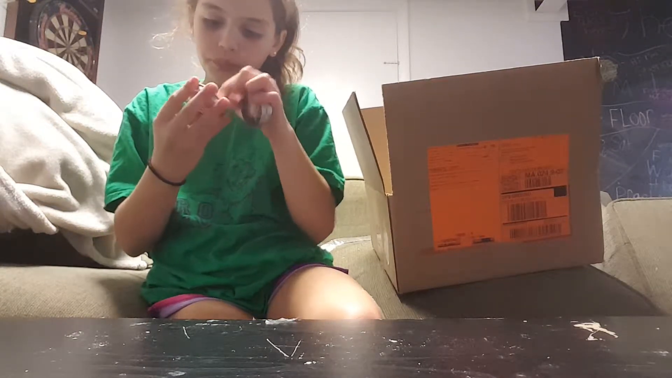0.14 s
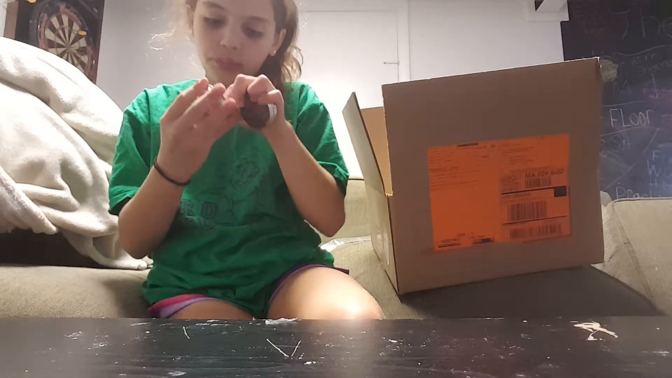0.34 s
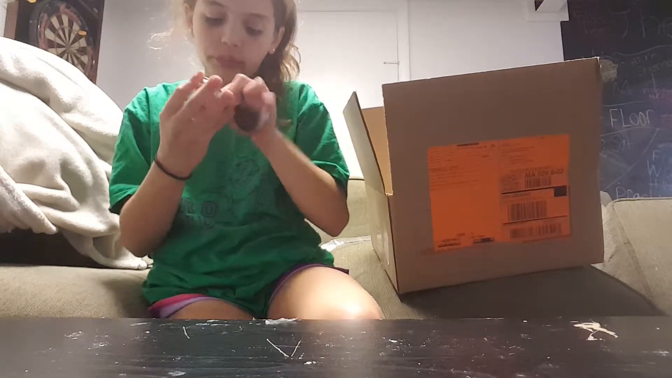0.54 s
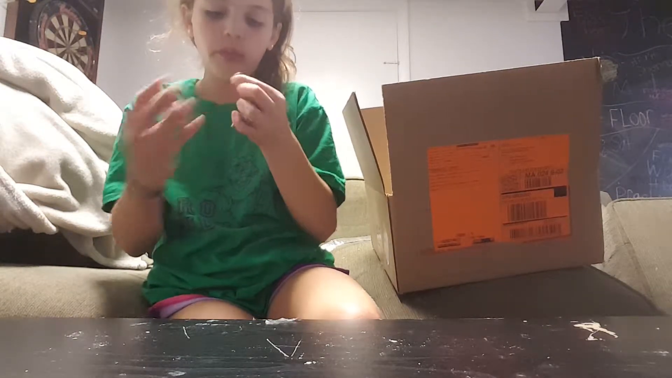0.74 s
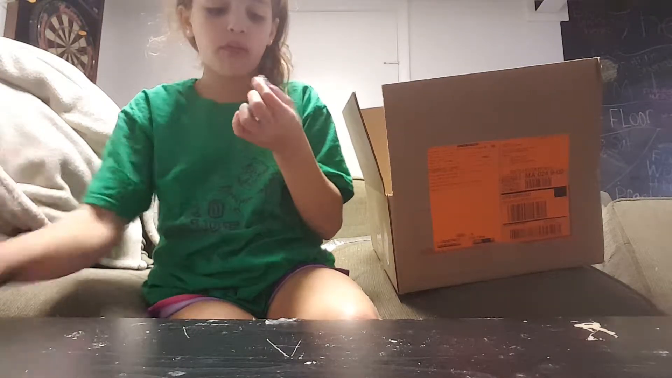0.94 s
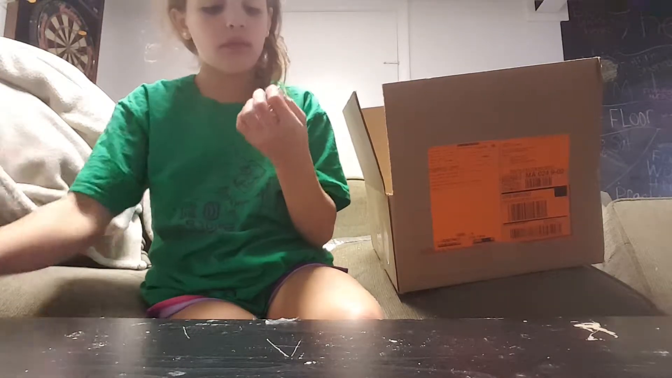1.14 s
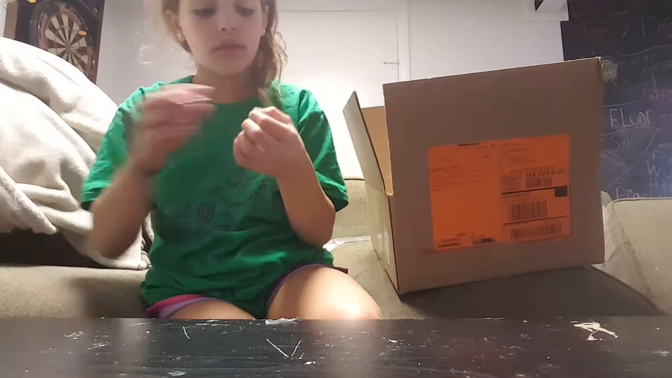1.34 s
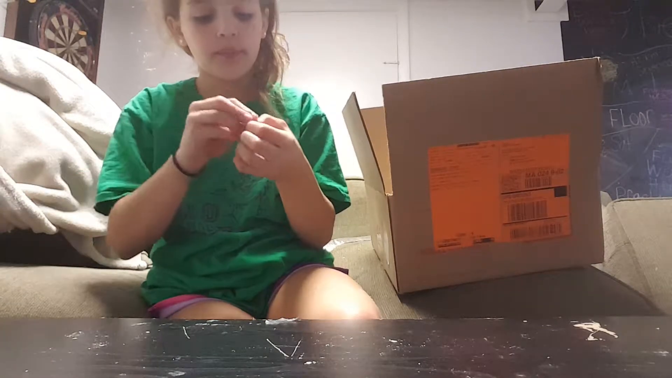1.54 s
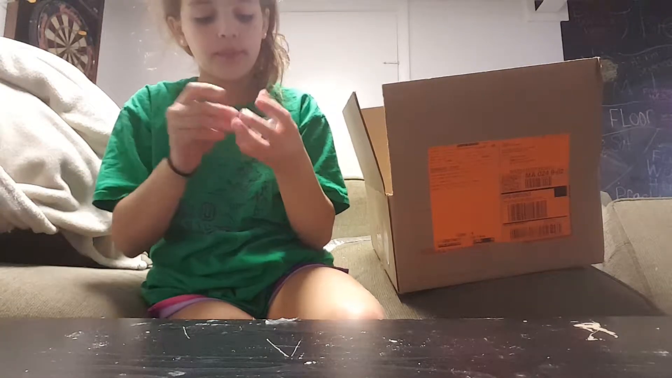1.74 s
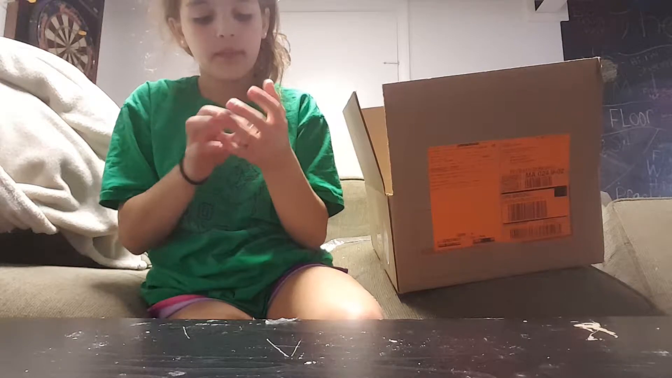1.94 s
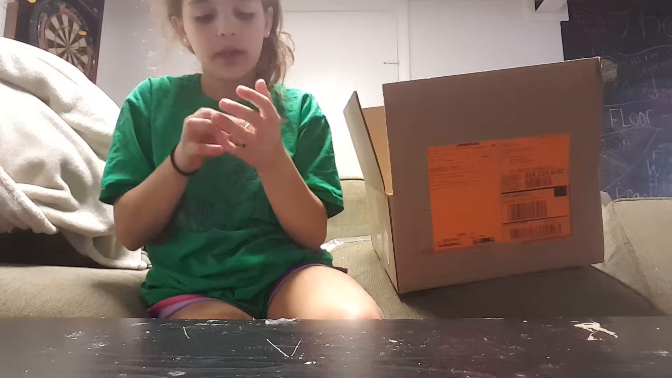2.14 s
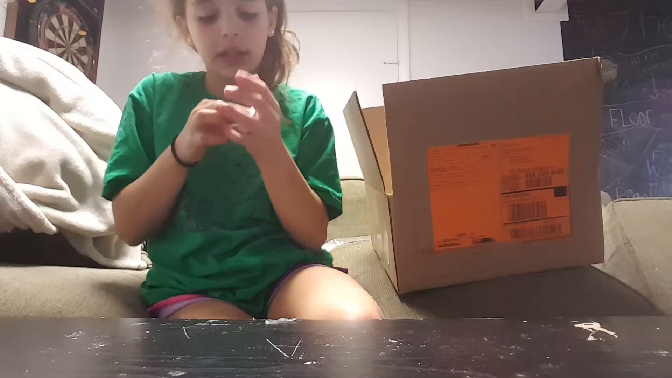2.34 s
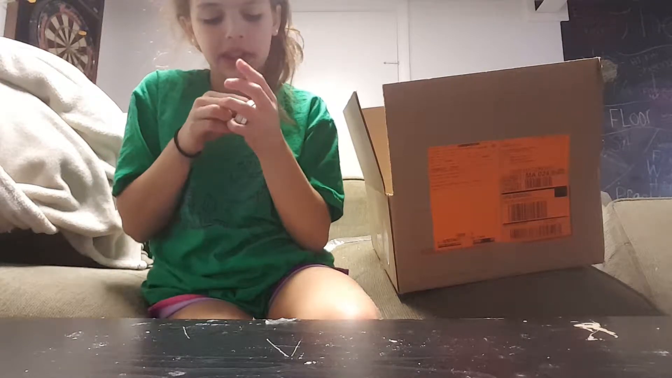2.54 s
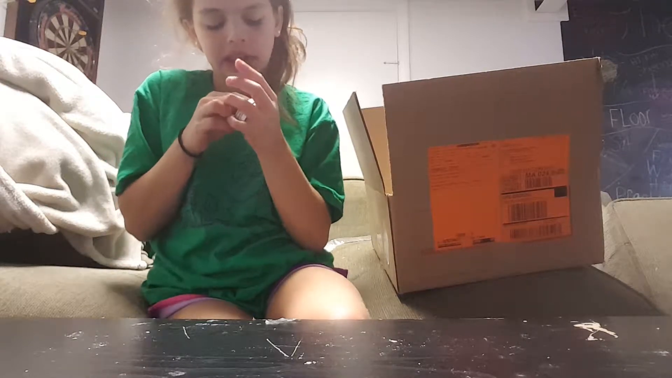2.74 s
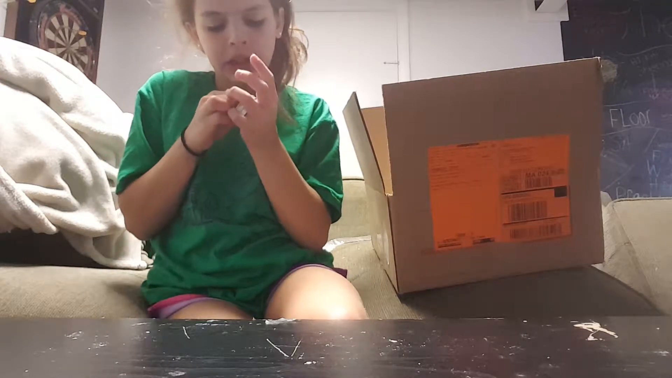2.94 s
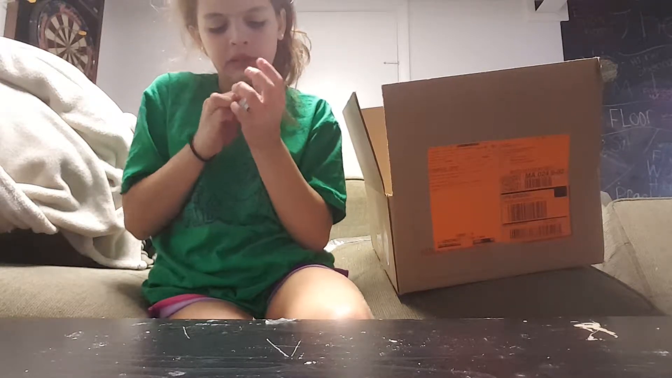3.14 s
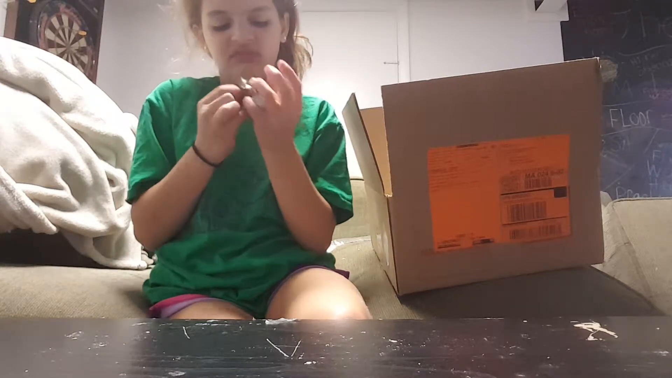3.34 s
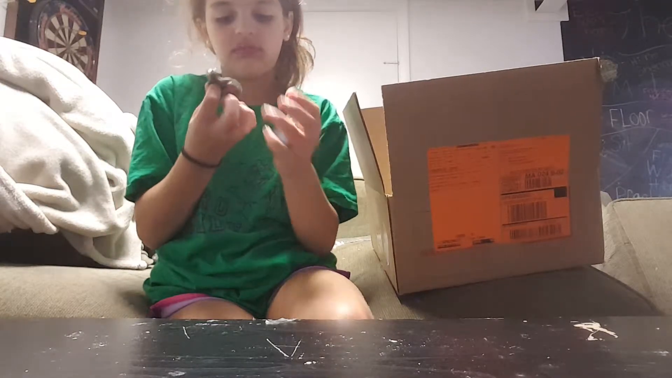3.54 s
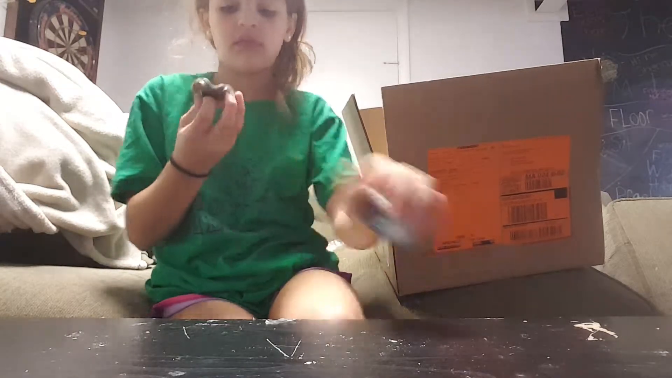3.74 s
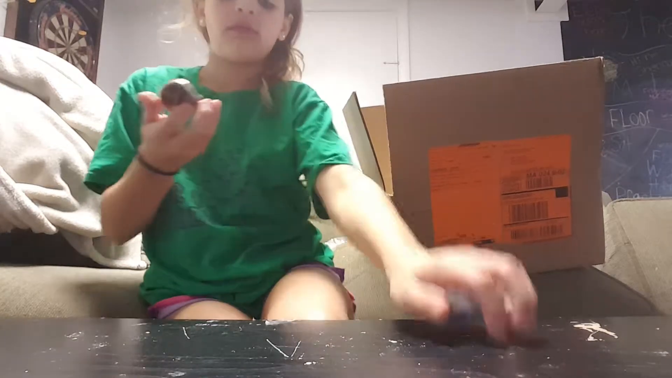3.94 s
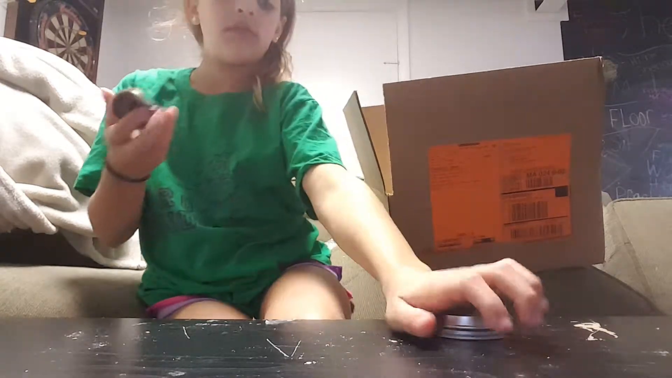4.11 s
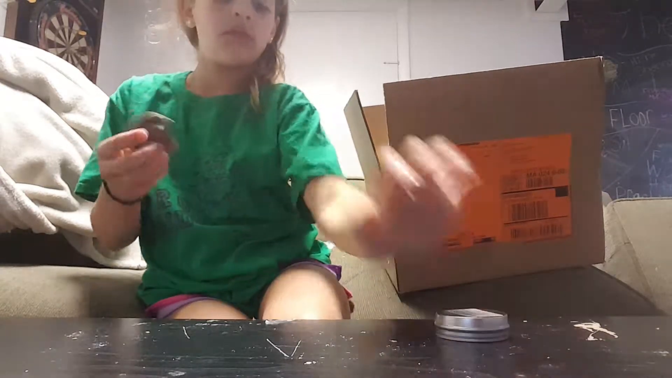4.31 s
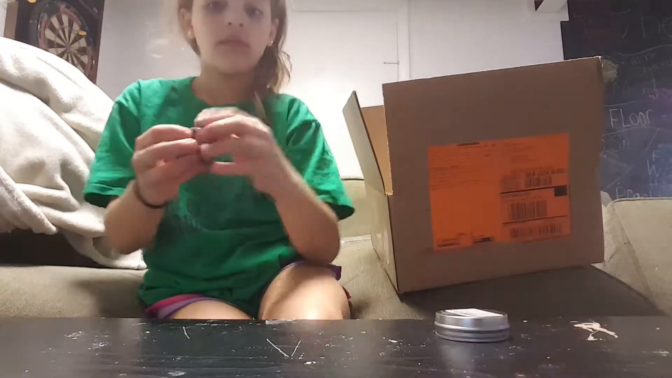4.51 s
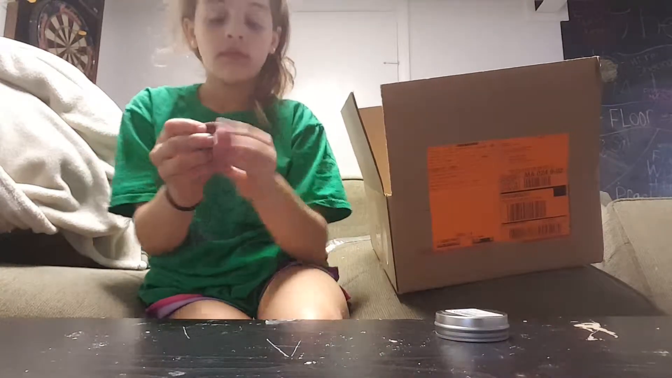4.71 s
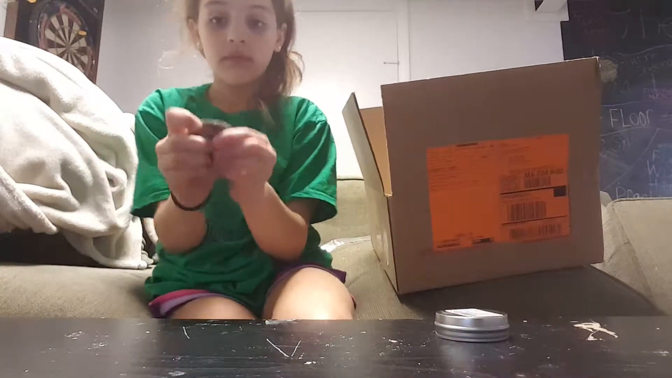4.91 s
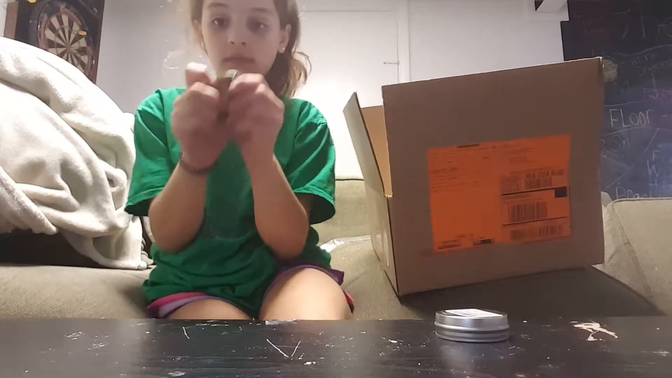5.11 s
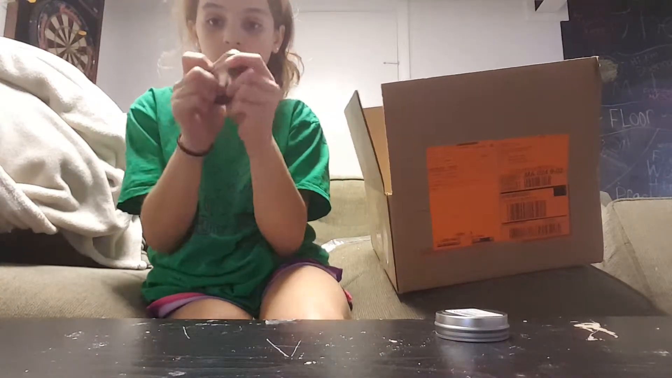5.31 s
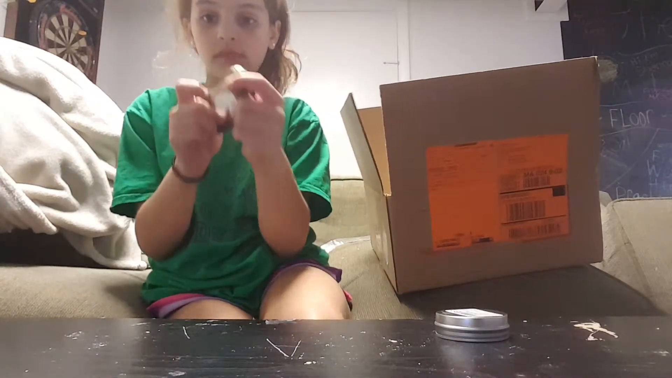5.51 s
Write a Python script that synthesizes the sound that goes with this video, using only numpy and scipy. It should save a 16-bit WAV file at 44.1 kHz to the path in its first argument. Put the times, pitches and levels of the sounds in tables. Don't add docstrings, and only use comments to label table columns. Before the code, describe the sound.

Sharp metallic clack and brief rattle on wood, quiet putty ticks and finger taps, then a second heavier tin clatter in a quiet room.

```python
import sys
import numpy as np
from scipy import signal
from scipy.fft import rfft, irfft
from scipy.io import wavfile
from scipy.ndimage import uniform_filter1d

SR = 44100
rng = np.random.default_rng(int(sys.argv[2]) if len(sys.argv) > 2 else 0)


def field_ratio(decibels):
    return 10 ** (np.asarray(decibels, dtype=float) / 20)


def unload_wav(signal):
    wavfile.write(
        sys.argv[1],
        SR,
        np.round(np.clip(np.atleast_2d(signal).T, -1, 1) * 32767).astype(np.int16),
    )


N = 250047

# frequency in Hz, level in dB per Hz.
TIN_WOOD = [(40, -63.5), (430, -10), (1250, 0.5), (1800, -3), (3300, -0.5), (4800, -13), (7500, -44),
            (16000, -49.5)]


def evened(x):
    return x / np.sqrt(np.mean(x ** 2) + 1e-20)


def peaked(x, db):
    return field_ratio(db) * x / abs(x).max()


def panned(pan_db):
    return field_ratio(np.array([[pan_db], [-pan_db]]) / 2)


def read(points, hz):
    f, value = np.transpose(points)
    return np.interp(np.log(hz + 1), np.log(f + 1), value)


def add(mix, s, sound):
    part = mix[..., round(s * SR):][..., :sound.shape[-1]]
    part += sound[..., :part.shape[-1]]


def contact(length_s):
    t = np.arange(1500) / SR
    grit = np.append(3.0, rng.standard_normal(len(t) - 1))
    return grit * np.exp(-t / max(length_s, 1e-4))


def causal(colour):
    log_gain = np.log(field_ratio(read(colour, abs(np.fft.fftfreq(4096, 1 / SR)))))
    taps = np.fft.ifft(np.exp(np.conj(signal.hilbert(log_gain)))).real[:2048]
    return taps / np.linalg.norm(taps)


def gain_db():
    drop_s, drop_db, hold_s, recover_s = 1.05, -13, 0.47, 1
    t = np.arange(N) / SR - drop_s
    return drop_db * (t > 0) * np.exp(-np.maximum(t - hold_s, 0) / recover_s)


def air_db(level_db, ducked, stirred):
    # time in seconds, stir in dB.
    stir = [(0, -5.5), (.6, -11), (.95, -7), (1.501, -3.5), (2.1, 2.5), (2.799, 2), (3.151, 2.5), (3.45, 1),
            (3.959, 1.5), (4.42, 0.5), (4.6, -1.3), (4.75, -0.5), (4.9, -1), (5.25, 4), (5.501, -2),
            (5.67, -1)]
    return level_db + ducked * gain_db() + stirred * np.interp(np.arange(N) / SR, *np.transpose(stir))


def air(level_db, colour, patchy_db, flicker_db):
    # frequency in Hz, left-right likeness from -1 to 1.
    likeness = [(60, 0.53), (180, 0.85), (550, 0.25), (1650, -0.42), (4970, 0.34), (15000, -0.44)]
    frames, hz = N // 256 + 5, np.fft.rfftfreq(1024, 1 / SR)
    a, b, c, d, patches = rng.standard_normal((frames, 513, 5)).T
    flicker = evened(uniform_filter1d(patches[0], size=4))
    patches = uniform_filter1d(patches, size=10, axis=0)
    patches = evened(uniform_filter1d(patches, size=12, axis=1))
    same = np.clip(read(likeness, hz), -1, 1)[:, None]
    left = a + 1j * b
    right = same * left + np.sqrt(1 - same ** 2) * (c + 1j * d)
    z = np.array([left, right])
    z *= field_ratio(read(colour, hz)[:, None] + patchy_db * patches + flicker_db * flicker)
    noise = signal.istft(z, nperseg=1024, noverlap=768)[1][:, :N]
    return field_ratio(level_db) * evened(noise)


def hiss():
    # frequency in Hz, level in dB per Hz.
    colour = [(1760, -32), (3000, -6.5), (4500, -2.5), (6860, -14), (11400, -7), (14000, -4), (15900, -8.5),
              (16300, -45)]
    return air(air_db(-77, ducked=0.79, stirred=0.2), colour, patchy_db=1.85, flicker_db=0.5)


def cloth():
    # frequency in Hz, level in dB per Hz.
    colour = [(180, -31), (300, -3), (388, -4.5), (1300, -9), (2570, -12), (3720, -20.5), (9000, -28),
              (11700, -59)]
    return air(air_db(-67.5, ducked=0.69, stirred=0.35), colour, patchy_db=1.0, flicker_db=0.5)


def rumble():
    # frequency in Hz, level in dB per Hz.
    colour = [(12, -13.5), (27, -18), (60, -9), (149, 0.5), (340, -16), (750, -24), (1300, -24),
              (2200, -79)]
    return air(air_db(-63, ducked=0.35, stirred=1.1), colour, patchy_db=2.0, flicker_db=1.2)


def hum():
    # frequency in Hz, rms in dB.
    harmonics = [(118.4, -74.5), (242.2, -82), (360.7, -84), (479.1, -83.5)]
    t = np.arange(N) / SR
    waver = evened(uniform_filter1d(rng.standard_normal((len(harmonics), N)), size=3000))
    lines = np.zeros(N)
    for (hz, db), w in zip(harmonics, waver):
        lines += field_ratio(db + 5.0 + 3.0 * w) * np.sin(2 * np.pi * hz * t)
    return lines * field_ratio(gain_db())


def knocks():
    # start in seconds, peak in
    # dB, pitch in Hz, t60 in seconds, contact length in seconds.
    touches = [(0.297, -53, 1060, 0.024, 0.0012), (0.303, -50.5, 1120, 0.019, 0.002),
               (0.653, -53.5, 845, 0.0059, 0.0022), (0.914, -47.5, 1050, 0.048, 0.0038),
               (1.673, -64.5, 3005, 0.021, 0.0023), (2.088, -66, 2599, 0.026, 0.0017),
               (2.231, -52, 2756, 0.022, 0.0016), (2.379, -56.5, 1090, 0.028, 0.002),
               (2.407, -60, 2020, 0.023, 0.0022), (2.875, -61.5, 2155, 0.051, 0.0023),
               (3.161, -49.5, 2150, 0.018, .002), (3.1696, -48, 2084, 0.02, .002),
               (3.301, -56, 1810, 0.014, 0.0012), (3.313, -47.5, 1994, 0.034, 0.0032),
               (3.336, -52, 1990, .02, 0.0023), (3.3572, -37, 2110, 0.0066, 0.0022),
               (3.836, -58, 2217, 0.022, 0.0018), (4.85, -57.5, 2120, 0.023, 0.0021),
               (5.032, -58.5, 1195, 0.018, 0.0019),
               (0.146, -52, 643, 0.011, 0.0009), (0.62, -48, 6150, 0.036, 0.0033),
             (0.624, -56, 4310, 0.091, 0.0035), (.917, -63, 4200, 0.037, 0.0014),
             (.918, -55.5, 6140, 0.06, .001), (2.83, -60.5, 4280, 0.013, 0.0019),
             (2.874, -59, 3970, 0.021, 0.0027), (3.039, -49, 465, 0.016, 0.00087),
             (5.172, -59, 2349, .015, 0.0021), (5.19, -40.5, 430, 0.043, 0.0063),
             (5.216, -55, 3680, 0.017, 0.0016), (5.217, -47, 1200, 0.012, 0.00087)]
    out, t, dry_grain = np.zeros(N), np.arange(2500) / SR, causal(TIN_WOOD)
    for s, db, hz, t60_s, length_s in touches:
        mode = field_ratio(-60 * t / max(t60_s, .002)) * np.sin(2 * np.pi * hz * t)
        add(out, s, peaked(signal.fftconvolve(contact(length_s), mode), db))
        add(out, s, peaked(signal.fftconvolve(contact(1.3 * length_s), dry_grain), db - 8.5))
    return np.array([np.roll(out, 3), out])


def ticks():
    # start in seconds, peak in dB, centre in Hz, left-right in dB.
    snaps = [(0.5861, -54, 11010, 10), (1.6724, -61.5, 8075, 1), (2.0894, -56, 10200, 3),
             (2.1156, -54, 14830, 6), (2.2024, -56.5, 7400, 0), (2.2321, -50, 10000, 2),
             (2.2452, -64, 14870, -1.5), (2.379, -47, 7930, 5), (2.3863, -56, 7900, -3.5),
             (3.0405, -60.5, 7190, -0.5), (3.067, -64, 12860, 7), (3.0834, -60, 12730, 7.5),
             (3.101, -62, 12840, 8), (3.173, -57, 12140, 15), (3.3199, -41, 11760, 6.5),
             (3.3269, -49.5, 11000, 8.5), (3.3304, -52, 12100, 8), (3.3347, -49, 10000, 1),
             (3.3548, -32, 11650, 9.5), (3.3625, -37, 10500, -5), (3.3732, -55.5, 10200, 0),
             (3.392, -54.5, 12450, 3), (3.462, -58, 14400, -1), (3.8274, -55, 10040, 6),
             (4.6407, -65, 11620, 7), (4.7948, -50, 12410, 9.5), (5.033, -57.5, 8680, 5),
             (5.225, -59.5, 14640, 10), (5.351, -62, 9250, 3.5), (5.5594, -60.5, 12090, 3)]
    out, snap_s = np.zeros((2, N)), 0.0011
    for s, db, hz, pan_db in snaps:
        band = signal.butter(2, [.6 * hz, min(1.4 * hz, 20000)], "band", fs=SR)
        burst = np.array([signal.lfilter(*band, contact(snap_s)) for _ in "LR"])
        add(out, s + .0012, peaked(burst, db + 2) * panned(pan_db))
    return out


def peels():
    # start in seconds, length in seconds, rms in dB, centre in Hz, left-right in dB.
    rubs = [(0.587, .068, -76, 8700, -1), (0.594, 0.044, -59.5, 1050, 1.5), (.605, .039, -60, 2150, 1),
            (0.609, 0.028, -61.5, 7800, 7), (2.867, 0.018, -72.5, 10080, 10), (3.034, 0.15, -63.5, 474, -4),
            (3.157, 0.031, -65, 2316, -5), (3.161, .015, -73.5, 10710, 4), (3.276, 0.12, -62, 2100, -7),
            (3.287, 0.045, -63, 832, 3), (3.319, 0.036, -72, 10590, 14), (3.357, 0.024, -66.5, 11700, -0.5),
            (3.369, .035, -69, 11700, 4.5), (3.355, 0.051, -69.5, 3013, 0.5), (4.065, 0.028, -64, 11000, 1),
            (4.242, .025, -72.5, 11400, 10.5), (4.446, .03, -56, 497, -1.5), (4.492, .026, -56.5, 501, 1.5),
            (4.528, 0.068, -62.5, 460, 4), (4.686, 0.1086, -78.5, 11000, 5), (4.846, 0.15, -70.5, 2374, -3)]
    # centre in Hz, width in Hz.
    widths = [(480, 180), (2100, 590), (8000, 8340), (12000, 6200)]
    out = np.zeros((2, N))
    for s, length_s, db, hz, pan_db in rubs:
        count, width_hz = round(length_s * SR), read(widths, hz)
        density = uniform_filter1d(rng.exponential(1, count) ** 2.2, size=30)
        swarm = density * rng.standard_normal((2, count))
        edges_hz = [max(hz - width_hz / 2, 50), min(hz + width_hz / 2, 20000)]
        swarm = evened(signal.lfilter(*signal.butter(2, edges_hz, "band", fs=SR), swarm))
        add(out, s, swarm * signal.windows.tukey(count, .7) * field_ratio(db) * panned(pan_db))
    return out


def ringing(modes, beat):
    t, (hz, db, t60_s) = np.arange(round(SR / 6)) / SR, np.transpose(modes)[..., None]
    signs = rng.choice([-1, 1], (len(modes), 1))
    shares = signs * rng.normal(1, 0.26, (len(modes), 2))
    beating = 1 + beat * np.sin(2 * np.pi * 0.02 * hz * t)
    out = shares.T @ (field_ratio(db - 60 * t / t60_s) * np.sin(2 * np.pi * hz * t) * beating)
    return out / np.sqrt(np.mean(np.sum(out ** 2, 1)))


def plate_at(modes, rise):
    band = signal.butter(2, [170, 4500], "band", fs=SR)
    return signal.lfilter(*band, ringing(np.array(modes) * [1 + rise, 1, 1], beat=1.0))


def spot(hz):
    t, level_db, cycles = np.arange(1500) / SR, 3.0, 37
    ring = field_ratio(level_db - 60 * t * hz / cycles) * np.sin(2 * np.pi * hz * t) * np.minimum(t * hz, 1)
    return ring[None] * np.sqrt(4 * np.log(1000) * hz / cycles / SR)


def edged(touch, edge):
    dull = signal.lfilter(*signal.butter(2, 1800, fs=SR), touch)
    return dull + edge * (touch - dull)


def sideways(x, late_samples):
    # frequency in Hz, left-right in dB.
    shading = [(1500, 0.9), (2400, 1), (3700, -5), (4300, -7), (7000, -6), (8400, 9.5), (10000, 11),
               (15000, 9)]
    hz, ears = np.fft.rfftfreq(N, 1 / SR), np.array([[1], [-1]])
    lag = late_samples * np.interp(hz, [1300, 2400], [.22, 1])
    gain = field_ratio(ears * read(shading, hz) / 2)
    return irfft(rfft(x) * gain * np.exp(-1j * ears * np.pi * hz * lag / SR), N)


def on_table(hits, chatters, poses, plate, stiffen, rim, wood, shiver_db, shiver_s, free_s, late_samples):
    board, rim, out = causal(wood)[None], ringing(rim, beat=.15), np.zeros((2, N))
    first_pose, last_pose = np.array(poses)
    slips_per_s, settle_s, muffle_db = 900, 0.0002, -22.5

    def pose_db(s, pose):
        return first_pose + pose * (last_pose - first_pose) + [0, 0, muffle_db * (s < free_s)]

    for s, db, pose, length_s, hz in hits:
        edge_db, plate_db, rim_db = pose_db(s, pose)
        tap = contact(length_s)[None]
        shiver = contact(shiver_s) + 2.4 * np.array([contact(shiver_s) for _ in "LR"])
        touch = tap + field_ratio(shiver_db) * shiver
        blow = edged(touch, field_ratio(edge_db))
        rings = field_ratio(plate_db) * plate_at(plate, stiffen * pose) + field_ratio(rim_db) * rim
        rings = edged(rings, field_ratio(edge_db))
        rough = signal.fftconvolve(blow, rings, axes=1)[:, :rings.shape[1]]
        sound = np.linalg.norm(touch[0]) * rings + field_ratio(-13.5) * rough
        add(sound, 0, signal.fftconvolve(blow, board, axes=1))
        add(sound, 0, signal.fftconvolve(tap, spot(hz), axes=1))
        settle = 1 - np.exp(-np.arange(sound.shape[1]) / (settle_s * SR))
        add(out, s, peaked(sound * settle, db))

    for s, length_s, first_db, last_db, pose in chatters:
        edge_db, plate_db, rim_db = pose_db(s, pose)
        count = round(length_s * SR)
        slips = rng.standard_normal(4000) * (rng.random(4000) < slips_per_s / SR)
        slips = evened(slips + 0.29 * rng.standard_normal((2, 4000)))[:, :count]
        slips = edged(slips * signal.windows.tukey(count, .2), field_ratio(edge_db - 5.0))
        slips = slips * field_ratio(np.linspace(first_db, last_db, count))
        bodies = (board, 0), (plate_at(plate, 0), plate_db - 3.0), (rim, rim_db + 3.0)
        for body, db in bodies:
            add(out, s, signal.fftconvolve(slips * field_ratio(db), body, axes=1))
    return sideways(signal.lfilter(*signal.butter(2, 170, "high", fs=SR), out), late_samples)


def lid():
    # start in seconds, peak in dB, tilt onto the rim 0-1, contact length in seconds,
    # pitch of the spot struck in Hz.
    hits = [(1.0343, -1, 0.05, 0.0006, 1148), (1.0388, -1, .1, 0.0011, 1182),
            (1.0508, -7, 1, 0.00086, 2300), (1.0769, -3, 1, .0012, 2510), (1.082, -8, 0, 0.0019, 2180),
            (1.1506, -15.5, 0, 0.0026, 2810), (1.1535, -18, 0.36, .002, 2710),
            (1.159, -22, 0.7, 0.0018, 1100), (1.1856, -30, 0.8, 0.001, 2820),
            (1.1916, -29, .7, 0.0014, 2960), (1.2065, -42.5, 0.6, 0.0018, 2500),
            (1.2098, -15, 0.25, 0.00196, 2200), (1.2125, -15, 0.26, 0.0017, 2290),
            (1.234, -17, 0.82, .0019, 2660), (1.2428, -13, 0.38, 0.00066, 849),
            (1.2455, -16, 0.1, 0.00201, 3200), (1.2515, -21.5, 0.27, 0.0014, 1030),
            (1.2605, -25, 0.18, .0015, 1070), (1.266, -30.5, 0.53, .0015, 995),
            (1.2745, -34, .6, 0.0013, 890)]
    # start in seconds, length in seconds, first and last rms in dB, tilt 0-1.
    chatters = [
        (1.088, 0.063, -35.5, -38.5, 0.3),
        (1.157, 0.05, -32, -32.5, 0.77),
        (1.214, 0.02, -32.5, -40, 0.7),
        (1.244, 0.034, -33.5, -37, 0.9),
        (1.277, 0.046, -44, -77.5, 0.53),
    ]
    # hard edge in dB, plate ring in dB, rim ring in dB.
    tilts = [
        (0.5, -2.5, -32.5),
        (-2, -3.5, -9),
    ]
    # frequency in Hz, level in dB, t60 in seconds.
    plate = [(210, -20, 0.05), (430, -11.5, 0.072), (756.7, -4, 0.052), (1004, -22, .15), (2100, -24, .25),
             (1130, -10.5, 0.065), (1194, 2.5, 0.035), (1460, -15, 0.03), (1904, -10, 0.083),
             (2280, -8.5, 0.1), (2752, -12.5, 0.014), (3044, -7.5, 0.067), (3420, -14.5, 0.024),
             (4320, -18.5, 0.026)]
    rim = [(3780, -4, 0.075), (4290, -12, .14), (4550, -14, 0.06), (5620, -15, .05), (6868, -1.5, .095),
           (8690, -16, .04), (9740, -11, 0.075), (12400, -20, .09), (15300, -30, .09)]
    # frequency in Hz, level in dB per Hz.
    wood = [(40, -45), (400, -12.5), (1150, -7), (2600, 1), (5000, -12), (7000, -25), (10000, -42.5),
            (16000, -54)]
    return on_table(hits, chatters, tilts, plate, -0.0044, rim, wood,
                    shiver_db=-5.5, shiver_s=0.0044, free_s=1.14, late_samples=17)


def bumps():
    # start in seconds, push in dB, swing in dB, pitch in Hz, left-right in dB.
    pushes = [
        (1.037, -39.5, -35.5, 73, 10),
        (3.99, -45.5, -53, 198, 5),
        (4.022, -59, -24.5, 206, 7),
        (4.098, -36, -38.5, 76, 5),
        (5.185, -35.5, -33.5, 135.2, 6.5),
        (5.2156, -30.5, -40.5, 72, -7.5),
    ]
    out, t, cycles = np.zeros((2, N)), np.arange(12000) / SR, 8.7
    late = np.maximum(t - .0015, 0)
    for s, push_db, swing_db, hz, pan_db in pushes:
        push = field_ratio(push_db) * np.exp(-((t - .0012) / 0.00044) ** 2)
        swing = field_ratio(swing_db - 60 * late * hz / cycles) * np.sin(2 * np.pi * hz * late)
        add(out, s, (swing - push) * panned(pan_db))
    return out


def tin():
    # start in seconds, peak in dB, cushioning by the hand 0-1, contact length in seconds,
    # pitch of the spot struck in Hz.
    hits = [(4.0203, -1.5, .03, 0.0015, 3430), (4.0265, -19.5, 1, .0032, 1144),
            (4.0965, -1, .02, 0.0024, 3250), (4.0995, -6.5, 0.2, .0026, 1250),
            (4.11, -20, .5, 0.0012, 1300), (4.1155, -21.5, .3, .0015, 2800),
            (4.1195, -21.5, .5, 0.0012, 1080), (4.1255, -22.5, .5, 0.0024, 1240),
            (4.13, -17, .55, 0.0033, 1250), (4.1425, -22, 0.5, 0.0016, 1047),
            (4.157, -26, .5, 0.0025, 1110), (4.2225, -33, .5, 0.0039, 907), (4.2345, -33, .8, 0.0018, 1110),
            (4.2408, -24, 1, 0.002, 930), (4.2475, -35, .9, 0.0022, 1160),
            (4.2535, -29.5, .9, 0.0036, 1020), (4.261, -27, .9, 0.0027, 1144),
            (4.268, -15, 0.95, 0.0025, 1300), (4.2775, -24.5, 0.95, 0.0015, 1170),
            (4.291, -23, .8, 0.0032, 880), (4.298, -26, .9, 0.0013, 1136),
            (4.3092, -3.5, 0.2, 0.0006, 2850), (4.313, -13, .4, .0012, 1250),
            (4.317, -21, .4, 0.0012, 1314), (4.3225, -15.5, .7, 0.001, 1036),
            (4.3305, -14, 0.3, 0.0026, 2933), (4.335, -12.5, .8, 0.0018, 1250),
            (4.3395, -13.5, .6, 0.00074, 1360), (4.3455, -17, 0.8, .0012, 1035),
            (4.359, -36, .5, 0.0017, 1305)]
    # start in seconds, length in seconds, first and last rms in dB, cushioning 0-1.
    chatters = [
        (4.03, 0.038, -32.5, -48, 0.7),
        (4.051, 0.045, -49.5, -38, 0),
        (4.106, 0.046, -37, -36, 0.04),
        (4.135, 0.09, -34.5, -49, 0.29),
        (4.217, 0.045, -47.5, -44, 0.6),
        (4.282, 0.011, -51, -47, 0.8),
        (4.315, 0.02, -35, -20, 0.6),
        (4.345, 0.052, -36, -62, 0.35),
    ]
    # hard edge in dB, plate ring in dB, rim ring in dB.
    grips = [
        (4, -3, -22.5),
        (-22.5, 1.5, -35.5),
    ]
    # frequency in Hz, level in dB, t60 in seconds.
    plate = [(427.7, -6, 0.097), (648, 2.5, 0.011), (845, -8.5, 0.13), (920, -32, 0.025),
             (966, -10.5, 0.036), (1090, -2, 0.1), (1186, 10, 0.024), (1250, 2, 0.019), (1370, -12, 0.092),
             (1678, -10.5, 0.028), (1850, -2.5, 0.0516), (2304, -12, .17), (2960, -5.5, 0.0184),
             (3488, -27, 0.014)]
    rim = [(4060, 6, .13), (4320, -4, .07), (5840, -8, .05), (7520, -18, .03), (8640, -9, 0.05),
           (10930, -6, .045), (13230, -5, .07), (13700, -11, .07)]
    return on_table(hits, chatters, grips, plate, 0.1, rim, TIN_WOOD,
                    shiver_db=-4.5, shiver_s=0.0033, free_s=0, late_samples=-18)


def tail(colour, t60s, seconds, start_s):
    hz, t, z = signal.stft(rng.standard_normal((2, round(seconds * SR))), SR, nperseg=128)
    decay_db = read(colour, hz)[:, None] - 60 * t / read(t60s, hz)[:, None]
    out = signal.istft(z * field_ratio(decay_db), SR, nperseg=128)[1]
    return np.pad(out / np.linalg.norm(out[0]), ((0, 0), (round(start_s * SR), 0)))


def room(near):
    # frequency in Hz, t60 in seconds.
    decay = [(100, 0.76), (500, 0.27), (2000, 0.2502), (6000, 0.053), (15000, 0.15)]
    response = tail([(50, 5), (3000, -5.5), (15000, -4.5)], decay, 0.4, .006)
    return field_ratio(-22) * signal.fftconvolve(near.mean(0)[None], response)[:, :N]


def scene():
    floor = hiss() + cloth() + rumble()
    floor = np.array([np.roll(floor[0], 4), floor[1]])
    near = knocks() + ticks() + peels() + lid() + bumps() + tin()
    return near + room(near) + floor + hum()


def band_limit(x):
    return signal.sosfilt(signal.butter(12, 16830, fs=SR, output="sos"), x)


def record(dry):
    ceiling = .94
    return band_limit(np.clip(dry, -ceiling, ceiling))


dry = scene()
out = record(dry)
unload_wav(out)
```